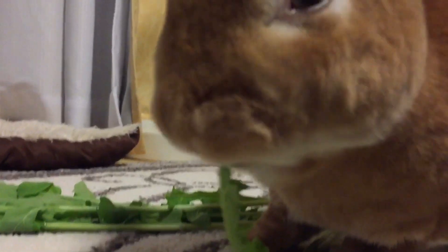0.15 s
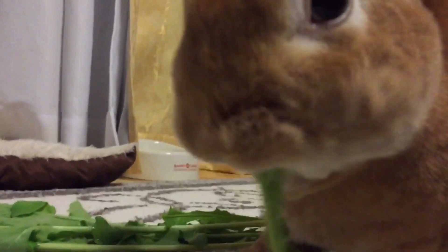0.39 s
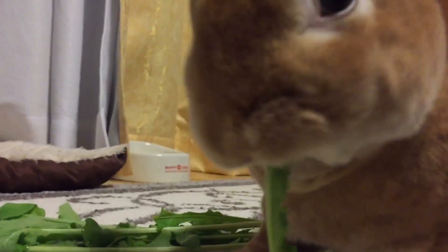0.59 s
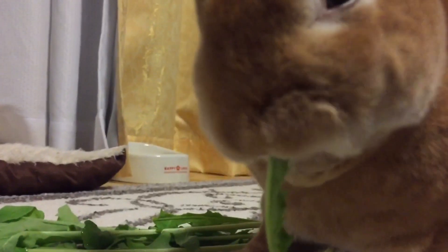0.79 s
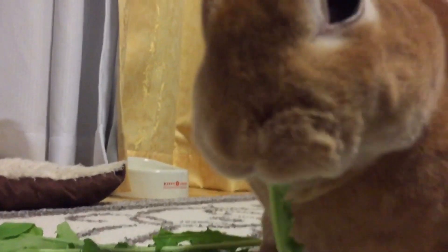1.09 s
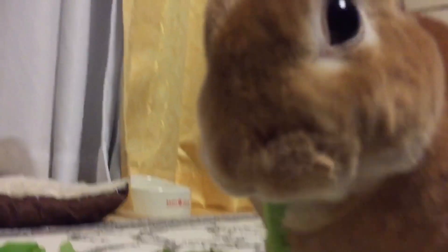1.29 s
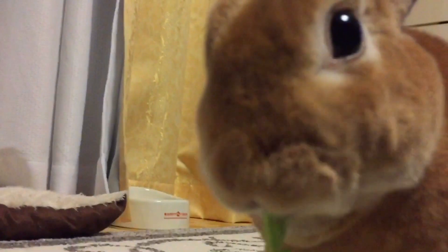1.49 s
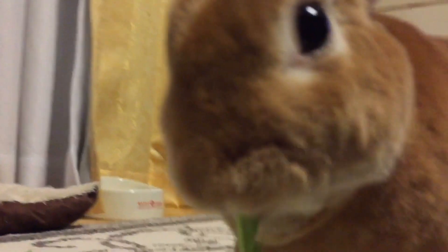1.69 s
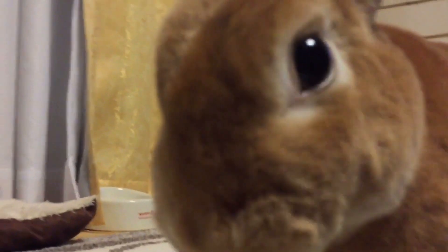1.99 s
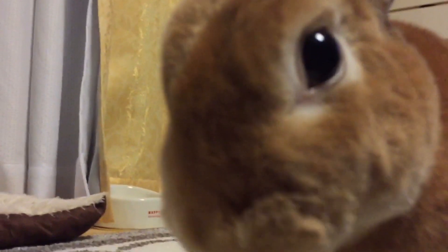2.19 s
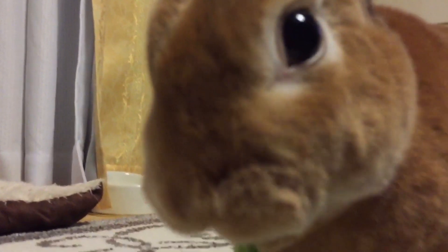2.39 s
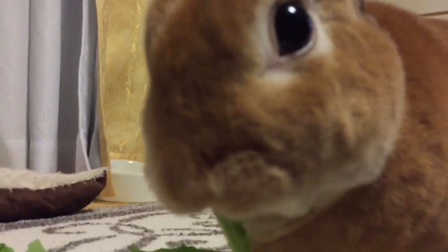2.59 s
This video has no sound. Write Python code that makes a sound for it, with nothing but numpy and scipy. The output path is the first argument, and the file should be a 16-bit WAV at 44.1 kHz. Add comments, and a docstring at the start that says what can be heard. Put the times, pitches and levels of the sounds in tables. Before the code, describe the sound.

Close mono chewing by a rabbit, bright crackly bites in uneven bursts, two stronger knocks around the first half, a brief soft brushing, then more crunches, over quiet rumble and hiss in a dry room.

```python
"""Rabbit chewing a leafy stalk

Small, dry, carpeted room; the rabbit is right in front of the microphone, recorded in mono.
Eighteen uneven bites are sprays of tiny bursting cells, with sharp ringing fibre snaps among them.
Wet ticks, mouth smacks, soft brushing and rubbing are filtered noise and bursts; dull bumps are
knocks with late bass. Underneath lie a wavering low hum, rumble and faint hiss."""
import sys
import numpy as np
from scipy import signal
from scipy.fft import rfft, irfft, next_fast_len
from scipy.io import wavfile
from scipy.ndimage import uniform_filter1d, map_coordinates

SR = 44100
rng = np.random.default_rng(int(sys.argv[2]) if len(sys.argv) > 2 else 0)


def bounce(signal):
    """Save signal as a 16-bit WAV file at the path given by the first command-line argument."""
    frames = np.transpose(np.atleast_2d(signal))
    limited = np.clip(frames, -1, 1)
    pcm = np.round(limited * 32767).astype(np.int16)
    wavfile.write(sys.argv[1], SR, pcm)


N = 119070  # samples, 2.7 s
TIME = np.arange(N) / SR


def amp(db):
    """Gain from decibels."""
    return 10 ** (np.asarray(db) / 20)


def unit(x):
    """x at rms 1."""
    return x / np.sqrt(np.mean(x ** 2) + 1e-20)


def sized(x, db, seconds):
    """A short sound with the energy of an rms level db held for that long."""
    return x * amp(db) * np.sqrt(seconds * SR / (np.sum(x ** 2) + 1e-30))


def along(points, hz):
    """Gain read from (frequency_hz, level_db) points on a log frequency axis."""
    point_hz, point_db = np.transpose(points)
    return amp(np.interp(np.log(hz + 1), np.log(point_hz + 1), point_db))


def filtered(x, response):
    """x times a response of frequency, padded so that the end does not wrap."""
    size = next_fast_len(N + 8192)
    spectrum = rfft(x, size) * response(np.fft.rfftfreq(size, 1 / SR))
    return irfft(spectrum, size)[:N]


def coloured(x, points):
    """x filtered to the given colour, at rms 1."""
    return unit(filtered(x, lambda hz: along(points, hz)))


def wobble(rate_hz):
    """A smooth random curve, rate_hz knots a second."""
    knots = rng.standard_normal(int(N * rate_hz / SR) + 4)
    return map_coordinates(knots, [TIME * rate_hz])


def add(track, start_s, sound):
    """Mix a sound into the track at start_s."""
    part = track[max(round(start_s * SR), 0):][:len(sound)]
    part += sound[:len(part)]


# Steady hum tones under the room: pitch_hz, level_db, unsteadiness (share of the tone)
HUM_TONES = [(118.4, -55, 0.11), (178, -58, 0.9)]


def hum():
    """Low tones, each wavering at random in strength and phase."""
    total = np.zeros(N)
    for pitch_hz, level_db, unsteadiness in HUM_TONES:
        waver = 1 + unsteadiness * (wobble(14) + 1j * wobble(13))
        tone = np.real(waver * np.exp(2j * np.pi * pitch_hz * TIME))
        total += amp(level_db) * unit(tone)
    return total


# Colour of the rumble: frequency_hz, relative level_db
RUMBLE_COLOUR = [(20, -30), (40, -9), (65, 0.5), (95, -6.5), (130, 0), (175, -0.5), (230, -6), (300, -13),
                 (450, -24), (900, -50)]
RUMBLE_DB = -53


def rumble():
    """Steady noise weighted to the lowest frequencies."""
    return amp(RUMBLE_DB) * coloured(rng.standard_normal(N), RUMBLE_COLOUR)


# Colour of the hiss, above its lower edge: frequency_hz, relative level_db
HISS_COLOUR = [(210, -19), (350, 2), (871, -3.5), (943, -4), (1040, -4.5), (2070, -6), (16000, -17)]
HISS_DB, HISS_LOW_HZ = -57.5, 295  # level, lower edge


def hiss():
    """Faint steady noise that thins out below its lower edge."""
    def response(hz):
        return along(HISS_COLOUR, hz) * hz ** 2 / (hz ** 2 + HISS_LOW_HZ ** 2)
    return amp(HISS_DB) * unit(filtered(rng.standard_normal(N), response))


def background():
    """Everything steady behind the rabbit: hum, hiss and rumble summed."""
    return hum() + hiss() + rumble()


ROOM_DB, ROOM_T60_S = -23, 0.11  # level of the answer, time to fall by 60 dB


def room(x):
    """The short, weak answer of a carpeted room: a decaying noise tail added to the direct sound."""
    t = np.arange(SR // 3) / SR
    tail = rng.standard_normal(len(t)) * amp(-60 * t / ROOM_T60_S) * (t > .003)
    return x + amp(ROOM_DB) * signal.fftconvolve(x, tail / np.linalg.norm(tail))[:N]


# Knocks: start_s, level_db, corner_hz (duller above it), dulling_db_per_octave
BUMPS = [(.218, -41, 115, 14), (.6205, -22.5, 1300, 1), (.770, -46, 110, 10), (1.101, -37.5, 171, 16),
         (1.245, -40.5, 185, 15), (1.4484, -22, 340, 3.5), (2.137, -51.5, 90, 14), (2.435, -48, 90, 14)]
# Colour of the knocked solid, before dulling: frequency_hz, relative level_db
BUMP_COLOUR = [(20, -42), (35, -16), (58, -5), (115, 0.5), (210, -5), (310, -5.5), (450, -10), (610, -0.5),
               (730, -6.5), (1150, 2.5), (1570, -4), (1950, 6), (2550, -9), (3200, -11.5), (4200, -14.5),
               (5200, -23), (6000, -19.5), (7500, -35), (16000, -52)]
LAG_CYCLES, LAG_KNEE_HZ = 1.05, 12  # each frequency arrives this many cycles late, down to the knee
REBOUND_S, REBOUND_SHARE = 0.00032, 0.87  # a second contact follows and hollows out the knock
RATTLE_DB, RATTLE_S = -15, 0.0035  # short rough ring after a knock: level, time constant


def bumps():
    """Knocks carried through a solid: treble arrives first, bass trails in a quick downward sweep."""
    track = np.zeros(N)
    hz, t = np.fft.rfftfreq(SR // 2, 1 / SR), np.arange(SR // 50) / SR
    lag = np.exp(-2j * np.pi * LAG_CYCLES * np.log(hz + LAG_KNEE_HZ))
    rebound = 1 + REBOUND_SHARE * np.exp(-2j * np.pi * hz * REBOUND_S)
    for start_s, level_db, corner_hz, dulling in BUMPS:
        softness = amp(-dulling * np.log2(1 + (hz / corner_hz) ** 4) / 4)
        knock = irfft(along(BUMP_COLOUR, hz) * softness * lag * rebound)[:SR // 10]
        rattle = rng.standard_normal(len(t)) * np.exp(-t / RATTLE_S)
        contact = (t == 0) + amp(RATTLE_DB) * rattle / np.linalg.norm(rattle)
        add(track, start_s, sized(np.convolve(knock, contact), level_db, 0.017))
    return track


CELLS_PER_S, CELL_SPREAD_DB = 2100, 3.5  # bursting cells, scale of their uneven sizes
JUICE_SHARE = 0.39  # smooth hiss among the cells
CELL_COLOUR_DB = 4.5  # the colour changes from cell to cell


def cells():
    """Dense tiny bursts of uneven size and colour, with some smooth hiss."""
    size_db = CELL_SPREAD_DB * np.minimum(rng.exponential(size=N), 3.5)
    bursts = amp(size_db) * np.sign(rng.standard_normal(N)) * (rng.random(N) < CELLS_PER_S / SR)
    spray = unit(bursts) + JUICE_SHARE * rng.standard_normal(N)
    spectrogram = signal.stft(spray, nperseg=128)[2]
    # random patches of time and frequency, louder or softer
    patches = uniform_filter1d(rng.standard_normal(spectrogram.shape), size=5, axis=0)
    patches = uniform_filter1d(patches, size=4, axis=1)
    return signal.istft(spectrogram * amp(CELL_COLOUR_DB * unit(patches)), nperseg=128)[1][:N]


def friction(swells, colour):
    """Grainy noise under smooth bell-shaped swells, whose powers add."""
    power = np.zeros(N)
    for middle_s, half_length_s, level_db in swells:
        bell = np.exp(-.5 * ((TIME - middle_s) / half_length_s) ** 2)
        power += (amp(level_db) * bell) ** 2
    grain = unit(cells()) + rng.standard_normal(N)
    return np.sqrt(power) * coloured(grain, colour)


# Soft rubs: middle_s, half_length_s, level_db
RUBS = [(.41, 0.035, -56.5), (.62, .025, -51), (.83, 0.028, -58.5), (1.235, 0.052, -57.5),
        (1.37, 0.044, -56), (1.44, 0.019, -45), (1.485, 0.026, -48.5), (1.775, .035, -54.5)]
# Colour of the rubbing: frequency_hz, relative level_db
RUB_COLOUR = [(100, -19), (400, -3), (1100, -1), (1600, -4), (2400, -4), (4000, -14.5), (7000, -22),
              (16000, -28)]


def rubbing():
    """Soft rubbing as the head moves, as swells of grainy friction."""
    return friction(RUBS, RUB_COLOUR)


# Soft brushes: middle_s, half_length_s, level_db
BRUSHES = [(1.648, 0.013, -47.5), (1.675, 0.014, -43), (1.712, .017, -42.5)]
# Colour of the brushing: frequency_hz, relative level_db
BRUSH_COLOUR = [(100, -18), (400, -9.5), (900, -8.5), (1300, -6), (1480, -1), (1600, 0.5), (1750, -4.5),
                (1910, 2.5), (2150, -8.5), (2700, -12.5), (4000, -16.5), (7000, -23), (11000, -27.5),
                (13500, -23), (16000, -32)]


def brushing():
    """Fur and leaf brush softly, as swells of grainy friction."""
    return friction(BRUSHES, BRUSH_COLOUR)


# Soft mouth noises: start_s, level_db, pitch_hz
SMACKS = [(.708, -55.5, 690), (.745, -51, 267), (.9, -55, 900), (.916, -52, 520), (1.148, -52.5, 450),
          (1.29, -54.5, 650), (1.352, -45, 170), (1.588, -44, 160), (1.856, -49.5, 386), (2.08, -46, 150),
          (2.58, -49.5, 475)]
SMACK_S, SMACK_CYCLES = 0.0044, 0.72  # time constants: of the push; of the hollow ring, in cycles


def smacks():
    """The closing mouth: a short push of noise sounds a heavily damped hollow."""
    track, t = np.zeros(N), np.arange(SR // 20) / SR
    for start_s, level_db, pitch_hz in SMACKS:
        ring = t * np.exp(-t * pitch_hz / SMACK_CYCLES) * np.sin(2 * np.pi * pitch_hz * t)
        push = rng.standard_normal(len(t)) * np.exp(-t / SMACK_S)
        add(track, start_s, sized(np.convolve(ring, push), level_db, 0.016))
    return track


# Colour of the crackle, also in the bites: frequency_hz, relative level_db
CRACKLE_COLOUR = [(800, -42), (3000, -21), (4500, -9), (5500, 0), (6500, -0.5), (8200, -2.5), (10300, -0.5),
                  (16000, -13)]
# Colour of the fine fizz, also in the bites: frequency_hz, relative level_db
FIZZ_COLOUR = [(3000, -38), (8000, -10), (10500, -14.5), (12500, -0.5), (15000, -2.5), (15700, -1),
               (16100, 4)]
CRUMBS_PER_S, CRUMB_DB, CRUMB_SPREAD_DB = 16, -69.5, 5.5  # rate, overall level, scatter in size


def crumbs():
    """Sparse faint ticks of wet leaf, at random moments throughout."""
    sizes = amp(CRUMB_SPREAD_DB * rng.standard_normal(N))
    ticks = sizes * (rng.random(N) < CRUMBS_PER_S / SR)
    return amp(CRUMB_DB) * unit(coloured(ticks, CRACKLE_COLOUR) + coloured(ticks, FIZZ_COLOUR))


# Fibre snaps: start_s, then a level_db for each of the four rings, before SNAP_DB
SNAPS = [(0.0656, -64, -68, -51, -51), (0.269, -62, -56, -46, -37), (0.339, -68, -70, -56, -40),
         (0.3494, -69, -71, -54, -34), (0.3653, -32, -53, -29.5, -31), (0.3791, -40.5, -59, -39.5, -33),
         (0.386, -48, -62, -42, -44), (0.5198, -62, -65, -45, -49), (0.5436, -69, -62, -54, -39),
         (0.5495, -46.5, -61, -46, -28), (0.6597, -46.5, -56, -46.5, -41.5), (0.7282, -62, -62, -30, -25),
         (0.7354, -51, -58, -46, -40), (0.7443, -51, -61, -52, -46), (0.7581, -60, -65, -54, -37),
         (0.9124, -65, -57, -33, -51), (0.9156, -43, -59, -22.5, -27.5), (0.9175, -46, -41, -23.5, -32),
         (0.9428, -62, -61, -44, -43), (0.9497, -38.5, -39.5, -34.5, -25), (1.0855, -73, -69, -49.5, -67),
         (1.1297, -67, -64, -30, -29), (1.1453, -47, -48, -39, -30), (1.1519, -44, -58, -37, -39),
         (1.1738, -62, -63, -47, -40), (1.2589, -57, -64, -49, -38), (1.4156, -60, -57, -61, -31.5),
         (1.605, -68, -62, -69, -32.5), (1.8556, -44, -43.5, -45, -49), (1.868, -60, -56, -46, -37.5),
         (1.896, -65, -51, -44, -39), (1.9392, -56, -47, -41, -49), (2.0462, -66, -50, -42, -30),
         (2.074, -33.5, -20, -33.5, -23.5), (2.1036, -61, -55, -43, -36.5), (2.2366, -74, -69, -65, -45),
         (2.2723, -69, -53, -47, -39), (2.2887, -33.5, -29.5, -27.5, -31.5), (2.298, -47, -53, -40, -44),
         (2.4281, -47, -63, -34, -32.5), (2.4411, -38, -35.5, -32.5, -26.5), (2.5454, -70, -58, -63, -30)]
# Rings of mouth and stalk: pitch_hz (before scatter), time_constant_s
RINGS = [(1400, 0.00024), (4700, .00013), (6700, 0.000089), (13600, 0.000041)]
SNAP_DB, SNAP_S, SNAP_SPREAD = -1.5, 0.0017, 0.055  # gain, length its level counts over, pitch scatter
SPLINTER_DB, SPLINTER_S = -6.5, 0.0013  # splinters that follow a snap: level, time constant


def snaps():
    """A fibre breaks and splinters, briefly ringing stalk and mouth."""
    track, t = np.zeros(N), np.arange(SR // 100) / SR
    for start_s, *levels_db in SNAPS:
        splinters = rng.standard_normal(len(t)) * np.exp(-t / SPLINTER_S)
        force = amp(SPLINTER_DB) * splinters / np.linalg.norm(splinters)
        force[0] += 1  # the break itself
        for (pitch_hz, tau_s), level_db in zip(RINGS, levels_db):
            scattered_hz = pitch_hz * np.exp(SNAP_SPREAD * rng.standard_normal())
            swell = (t / tau_s) ** 2 * np.exp(-t / tau_s)
            ring = swell * np.sin(2 * np.pi * (scattered_hz * t + rng.random()))
            add(track, start_s, sized(np.convolve(force, ring), level_db + SNAP_DB, SNAP_S))
    return track


def stroke(start_s, length_s, rise_s, fall_s, sag_db=0):
    """Exponential attack, sagging hold and exponential release of one bite."""
    attack = np.minimum(TIME - start_s, 0) / rise_s
    release = np.maximum(TIME - start_s - length_s, 0) / fall_s
    progress = np.clip((TIME - start_s) / length_s, 0, 1)
    return np.exp(attack - release) * amp(-sag_db * (progress - .5))


# Bites: start_s, length_s, crackle level_db, fizz level_db, fall over the bite in dB, mouth level_db
BITES = [(0.0, .014, -58, -51, 12, -64), (0.343, 0.044, -49, -45.5, 1, -53),
         (0.5197, 0.0048, -39, -53, 10, -62), (.544, 0.0072, -46, -37, -6, -52.5),
         (0.561, 0.013, -62, -43, -9, -51.5), (0.715, 0.019, -47, -40, -6, -58),
         (0.741, 0.021, -51, -46, 4, -57), (0.907, 0.02, -41.5, -47, -2, -51),
         (0.934, 0.022, -46.5, -45, 2, -55.5), (.955, .013, -53, -44, 0, -55),
         (1.114, 0.063, -51, -54, 6, -53), (1.251, 0.029, -51.5, -60, -3, -54.5),
         (1.849, 0.052, -50, -46, 2, -53.5), (2.044, 0.047, -43.5, -38.5, 13.5, -50.5),
         (2.235, 0.033, -59, -49, -4, -69), (2.263, 0.04, -46.5, -51, -1.5, -54.5),
         (2.413, 0.042, -47.5, -48, 2.5, -55), (2.56, 0.028, -56, -46.5, -6, -60)]
# Colour of the grinding in the mouth: frequency_hz, relative level_db
MOUTH_COLOUR = [(100, -30), (300, -3), (550, 1.5), (900, 2), (1400, 1.5), (2200, 0), (3500, -4),
                (6000, -12), (12000, -40)]
BITE_RISE_S, BITE_FALL_S = 0.0028, 0.0047  # time constants of the crush
MOUTH_RISE_S, MOUTH_FALL_S = 0.013, 0.007  # time constants of the grinding
FRINGE_DB, FRINGE_S = -15, 0.04  # the leaf shifts before and after a bite: level, time constant


def bites():
    """The teeth crush the leaf: crackle and fine fizz outside, a duller grinding in the mouth."""
    power = np.zeros((3, N))
    for start_s, length_s, crackle_db, fizz_db, sag_db, mouth_db in BITES:
        fringe = amp(FRINGE_DB) * stroke(start_s, length_s, FRINGE_S, FRINGE_S)
        bite = stroke(start_s, length_s, BITE_RISE_S, BITE_FALL_S, sag_db)
        crush = np.hypot(bite, fringe)
        grind = stroke(start_s, length_s, MOUTH_RISE_S, MOUTH_FALL_S)
        power[0] += (amp(crackle_db) * crush) ** 2
        power[1] += (amp(fizz_db) * crush) ** 2
        power[2] += (amp(mouth_db) * grind) ** 2
    crackle = np.sqrt(power[0]) * coloured(cells(), CRACKLE_COLOUR)
    fizz = np.sqrt(power[1]) * coloured(cells(), FIZZ_COLOUR)
    grinding = np.sqrt(power[2]) * coloured(cells(), MOUTH_COLOUR)
    return crackle + fizz + grinding


def scene():
    """The rabbit in its room, in mono; bumps and background do not pass through the room's answer."""
    chewing = bites() + snaps() + crumbs() + smacks()
    in_room = room(chewing + brushing() + rubbing())
    return (in_room + bumps() + background())[None]


TOP_HZ = 15950  # middle of the recorder's upper band edge


def record(dry):
    """The recorder's band limit: a 300 Hz wide slope down to silence around TOP_HZ."""
    def response(hz):
        return np.clip((TOP_HZ - hz) / 300 + .5, 0, 1)
    return np.array([filtered(channel, response) for channel in dry])


dry = scene()
out = record(dry)
bounce(out)
```